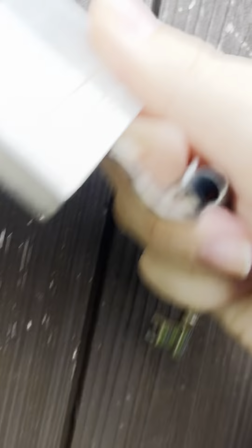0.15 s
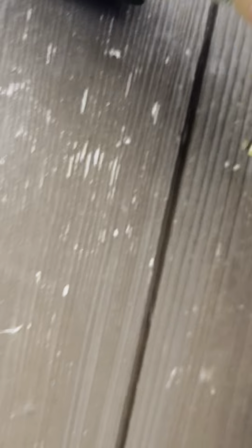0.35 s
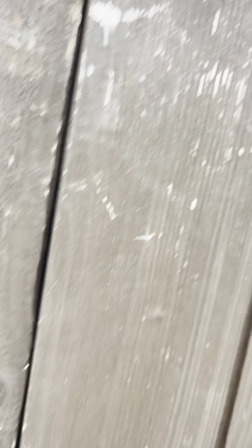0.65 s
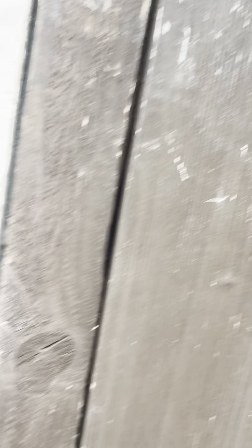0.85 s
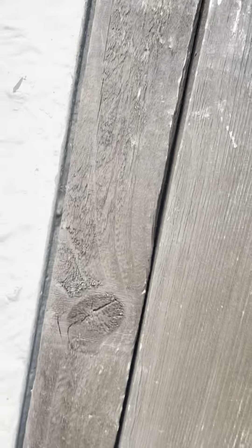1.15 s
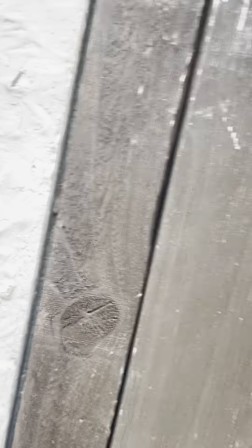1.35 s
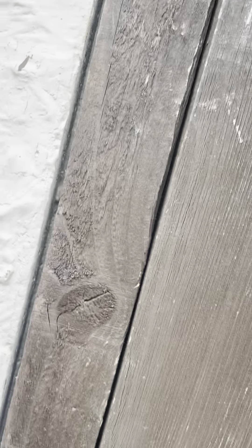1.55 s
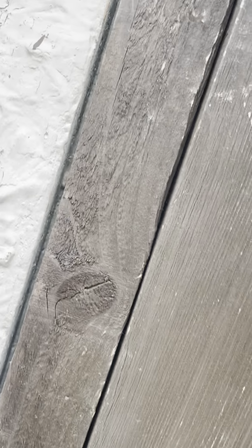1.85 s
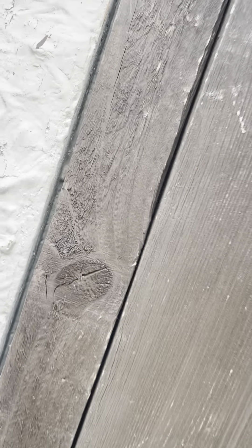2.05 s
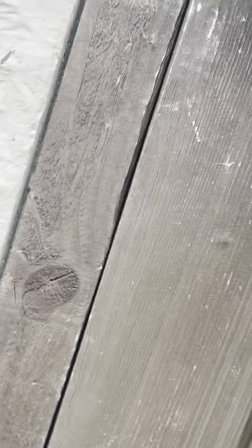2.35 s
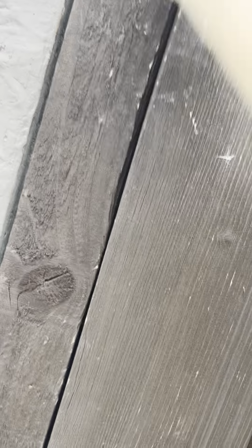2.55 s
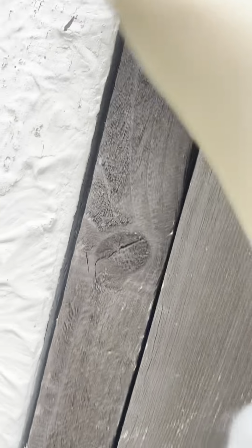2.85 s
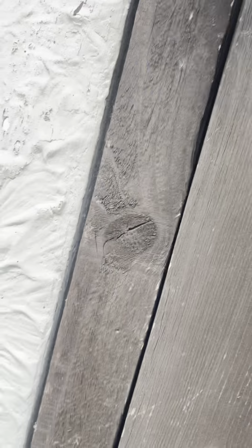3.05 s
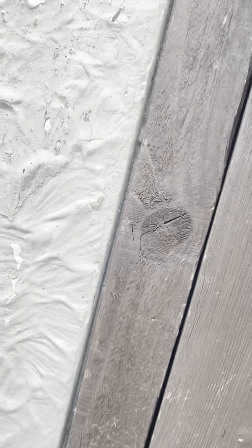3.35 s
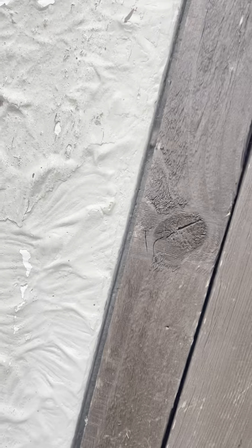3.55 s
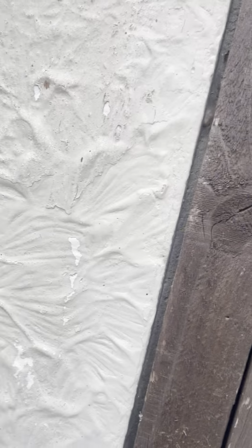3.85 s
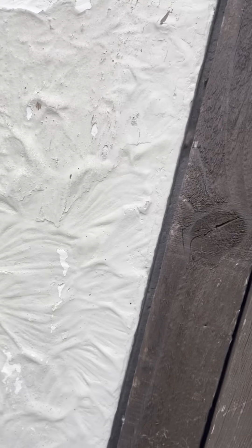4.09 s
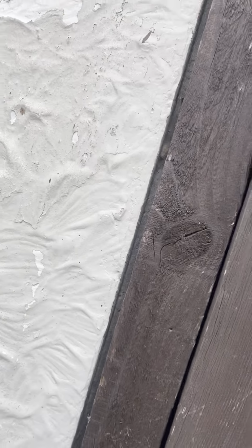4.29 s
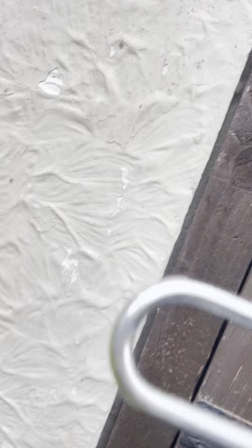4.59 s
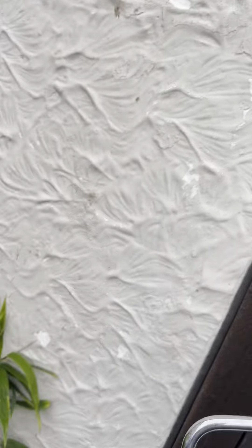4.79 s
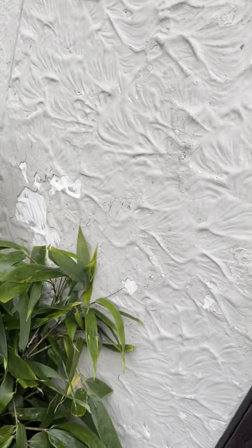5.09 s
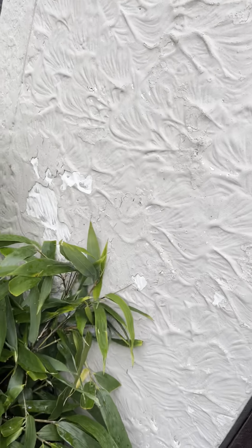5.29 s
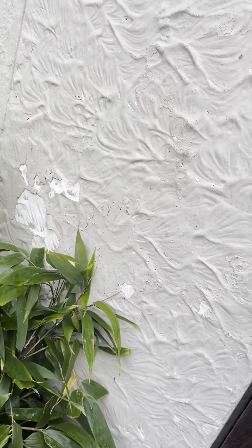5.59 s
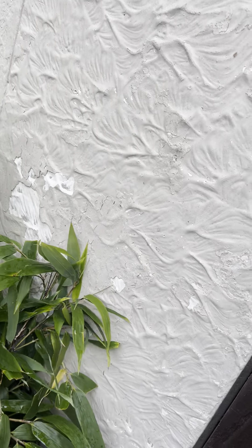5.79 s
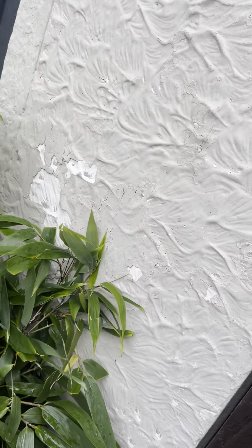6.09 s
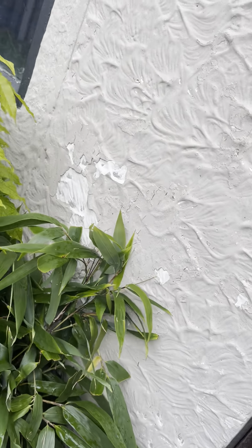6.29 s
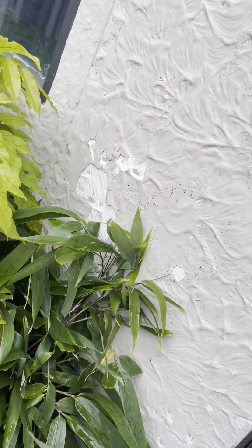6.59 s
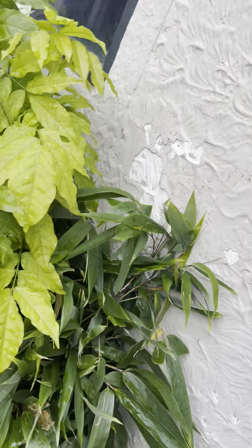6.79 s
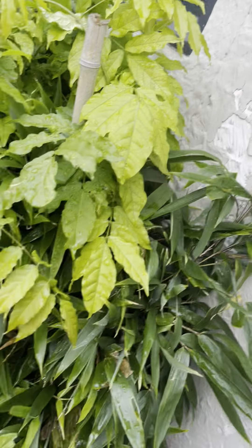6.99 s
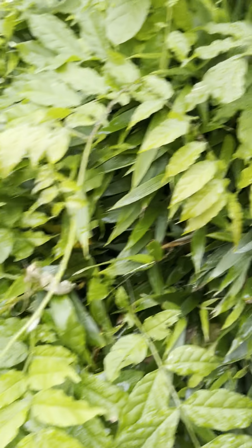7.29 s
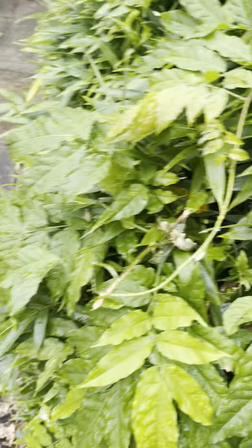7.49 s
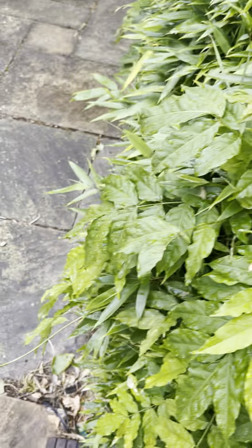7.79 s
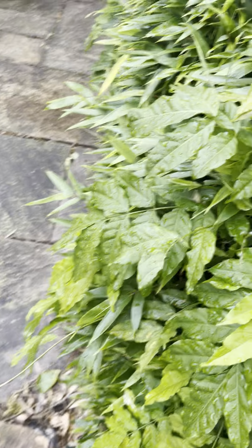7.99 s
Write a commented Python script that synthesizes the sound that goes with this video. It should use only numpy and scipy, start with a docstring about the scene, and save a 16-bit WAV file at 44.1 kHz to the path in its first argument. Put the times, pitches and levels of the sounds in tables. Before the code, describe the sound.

Keys jingle and clack in the lock of a wooden plank door, with sharp metallic knocks, small scrapes and one brief squeak.

```python
"""Keys click and scrape in the lock of a wooden plank door, bolts knock into the wood, and the cylinder squeaks.
Noise bursts ring modes of keys, lock case and planks; wavering sines squeak and single keys ring on.
Shaped noise makes friction, the rustle of cloth and leaves, far traffic, and a low handling rumble.
A hand-held phone hears it all through two microphone ports that differ in phase and bass."""
import sys
import numpy as np
from scipy import signal
from scipy.fft import rfft, irfft, next_fast_len
from scipy.io import wavfile
from scipy.ndimage import uniform_filter1d

SR = 44100
rng = np.random.default_rng(int(sys.argv[2]) if len(sys.argv) > 2 else 0)


def digitize_waveform(pressure):
    """Quantize a signal to 16-bit integers and store it at the path in sys.argv[1].

    Rows of a 2-D input are taken as channels; values are limited to [-1, 1].
    """
    field = np.atleast_2d(pressure).T
    bounded = np.clip(field, -1, 1)
    quanta = np.round(bounded * 32767).astype(np.int16)
    wavfile.write(sys.argv[1], SR, quanta)


N = 358974

# blows of metal on metal: t/s, drive of lock case/dB, of keys/dB, of door/dB,
# best excited region of the lock f/Hz, of the door f/Hz
BLOWS = [(0.016, -35, -34, -50, 744, 364), (0.078, -41, -46, -47, 735, 423),
         (0.188, -39, -38.5, -52.5, 2950, 158.6), (.203, -43, -41, -43, 826, 360),
         (.244, -32, -52, -75, 3880, 120), (.251, -18.5, -25, -30.5, 754, 238),
         (0.321, -37.5, -25.5, -42, 1270, 154), (0.435, -79, -32, -56.5, 1070, 300),
         (0.576, -35, -72, -36.5, 724, 383), (.743, -55, -42.5, -45.5, 945, 210),
         (0.843, -55, -69, -43, 810, 163), (0.924, -46.5, -67, -49.5, 750, 164),
         (1.333, -5, -10, -18, 2050, 220), (1.426, -31, -54, -39.5, 1380, 440),
         (1.505, -17, -45, -24, 1350, 314), (1.756, -30, -44, -34.5, 2640, 118),
         (1.929, -3, -13.5, -12.5, 750, 190), (1.985, -5.5, -12.5, -21, 1380, 175.1),
         (2.048, -35, -96, -31, 734, 128), (2.155, -37.5, -46, -36, 830, 144),
         (2.203, -34.5, -35, -41, 1160, 121), (2.315, -46.5, -73, -41, 980, 116),
         (2.367, -23.5, -60, -30, 1350, 229), (2.411, -38.5, -42.5, -39.5, 1230, 232),
         (2.52, -39.5, -47.5, -28.5, 790, 234), (2.567, -34, -50, -32.5, 880, 144),
         (2.595, -17.5, -27, -26, 845, 145), (2.923, -38, -35, -54, 3970, 122),
         (2.991, -37, -55, -44, 760, 288), (3.044, -40.5, -33.5, -44.5, 940, 126),
         (3.184, -18, -39.5, -26, 1620, 295), (3.265, -5, -3, -23.5, 1370, 209),
         (3.585, -29, -54, -25, 700, 220), (3.768, -58, -69, -43, 897, 237),
         (3.843, -44.5, -45.5, -52, 810, 132.4), (3.9, -27.5, -48.5, -32, 1190, 134),
         (3.938, -20.5, -50, -28, 1350, 296), (4.005, -31, -50, -44, 935, 161),
         (4.102, -13, -11.5, -30, 2380, 382), (4.144, -39, -44, -44.5, 775, 124),
         (4.192, -47, -49, -53, 930, 121), (4.352, -47, -62, -48.5, 716, 407),
         (4.406, -56, -49, -70, 890, 120), (4.432, -57, -42, -58, 750, 315),
         (4.462, -60, -42.5, -64, 714, 295), (4.863, -10.5, -7.5, -18, 2240, 450),
         (4.956, -22, -46, -27, 1280, 589), (4.965, -8.5, -6.5, -29, 1350, 440),
         (5.013, -20.5, -32.5, -30, 1220, 139), (5.071, -62, -56, -47.5, 1070, 214),
         (5.14, -39, -31.5, -48, 4220, 186), (5.166, -20.5, -23, -24.5, 4330, 392),
         (5.178, -23, -29.5, -31, 4300, 233), (5.22, -33.5, -47, -37.5, 785, 230),
         (5.257, -21.5, -34, -43, 2470, 153), (5.316, -36, -44, -49, 1080, 445),
         (5.361, -32.5, -30.5, -52, 1240, 157), (5.387, -31.5, -29, -42, 1620, 490),
         (5.405, -35.5, -41, -36, 1240, 328), (5.43, -35.5, -40, -35, 1480, 394),
         (5.499, -62.5, -49, -76, 814, 168.7), (5.632, -38.5, -68.5, -46.5, 1213, 338),
         (6.185, -13.5, -19.5, -26, 2390, 327), (6.27, -7.5, -32, -21.5, 910, 626),
         (6.289, -2.5, -8, -23.5, 1140, 162), (6.315, -18, -36, -32, 1340, 196),
         (6.348, -14.5, -52, -33, 1140, 237), (6.381, -20.5, -37.5, -43.5, 1410, 215),
         (6.474, -10.5, -30.5, -31, 2540, 444), (6.701, -43.5, -53, -59, 1350, 232),
         (6.893, -47.5, -52, -57, 1113, 174), (7.361, -40.5, -73, -43.5, 1660, 342),
         (7.389, -30, -58, -34, 1610, 606), (7.418, -32.5, -50.5, -36.5, 1220, 380),
         (7.462, -41, -85, -43, 1590, 168), (7.536, -27.5, -48, -36.5, 1390, 672),
         (7.553, -28.5, -41.5, -36.5, 1840, 281), (7.612, -37.5, -63, -46, 1950, 159),
         (7.689, -29, -73, -28, 1180, 350), (7.921, -42.5, -54, -65, 750, 118)]
# ringing modes of each body: f/Hz, relative level/dB, t60/s
DOOR_MODES = [(119, -5.5, 0.069), (161, -2, 0.099), (232.4, -1.5, 0.17), (292.4, -5, .07), (326, 1, 0.049),
              (395.8, 1.5, 0.041), (466.4, -3, 0.05), (492, -6, 0.12), (626.8, -2.5, 0.014)]
LOCK_MODES = [(755, -3, .03), (904, -3, .03), (1173, 0, .025), (1350, -1, .025), (1650, -1, .025),
              (1870, -3, .02), (2190, 0, .02), (2500, 0, .018), (2800, -3, .015), (3270, -6, .015),
              (3800, -8, .012), (4300, -3, .02)]
KEY_MODES = [(5080, -1, 0.024), (5710, 3.5, 0.0025), (6170, -2, 0.0027), (6730, -6.5, .01),
             (8400, 4, 0.0034), (8870, 0.5, .008), (10370, -1, 0.0034), (10460, -1.5, 0.03),
             (11460, -3, 0.01), (12940, 1, 0.02)]


def lock_and_door(friction_db, load_db):
    """Blows and scrapes add up in keys, lock case and planks, each heard in its own band."""
    keys, case, planks = np.add(struck(), rubbed(friction_db, load_db))
    return band(keys, 4000, 15000) + band(case, 450, 6000) + band(planks, 80, 1400)


def struck():
    """Metal parts bounce many times in one blow and drive the modes; the heavy planks answer last."""
    # the louder the keys ring against the lock, the higher their best region: keys over lock level/dB, f/Hz
    key_region = [(-6, 6300), (1, 11300)]
    start, lock_db, key_db, door_db, lock_hz, door_hz = np.transpose(BLOWS)
    key_over_lock_db = key_db - lock_db
    key_hz = np.interp(key_over_lock_db, *np.transpose(key_region))
    # time base of the rattle, shorter where the keys ring over the lock; each layer scales it
    ms = 4.96 - 0.0437 * np.maximum(key_over_lock_db, 0)
    # soft blows, where the keys hardly ring, crack less in the treble
    crack_db = lock_db + 0.57 * np.minimum(key_over_lock_db, 0) + 4.5
    key_grit, case_grit, wood_grit = [grit(14000, 0.7) for _ in range(3)]

    # a hard first contact, then the bounces
    key_push = push(start, key_db + 5.5, np.minimum(0.15 * ms, .8), rise_ms=0.18)
    key_push += push(start, key_db + 3.0, 0.61 * ms, rise_ms=0.99)
    keys = key_grit * key_push
    case_push = push(start, lock_db, 0.54 * ms, rise_ms=0.49)
    case_push += push(start, lock_db - 16, 2.22 * ms, rise_ms=0.99)
    case = case_grit * case_push
    crack = case_grit * push(start, crack_db, 0.51 * ms, rise_ms=0.63)
    # wood takes one soft push and a little of the chatter
    planks = push(start, door_db + 12.5, 0.048 * ms, rise_ms=0.27, late_ms=3.)
    planks += wood_grit * push(start, door_db + 5.5, 2.0 * ms, rise_ms=3.5, late_ms=3.9)

    # ringing bodies plus the direct clatter of the metal
    key_sound = undb(4) * body(keys, KEY_MODES, 3, start, key_hz, 10) + undb(1) * keys
    clatter = band(case, 600, 2200) + band(crack, 2200, 5500)
    case_sound = body(case, LOCK_MODES, 2.5, start, lock_hz, 9) + undb(4) * clatter
    return key_sound, case_sound, body(planks, DOOR_MODES, 5.2, start, door_hz, 11.0)


def rubbed(friction_db, load_db):
    """The key drags over the pins, and light friction and load keep the same bodies whispering."""
    # scrapes that swell and stop: start t/s, length/s, drive of lock case/dB, of keys/dB, of door/dB,
    # best excited region of the lock f/Hz
    scrapes = [(1.113, 0.02, -32, -41, -28.5, 1980), (1.306, 0.025, -24.5, -38, -58, 1910),
               (1.391, 0.039, -40.5, -46, -54, 2150), (1.627, .071, -28.5, -38.5, -29, 4340),
               (1.682, .036, -26, -33.5, -22.5, 4430), (1.814, 0.053, -55, -57, -56, 4300),
               (1.905, 0.022, -23, -36, -28.5, 1170), (1.971, 0.016, -23, -40, -31, 890),
               (2.073, 0.037, -51.5, -49, -41.5, 4300), (2.136, 0.015, -39, -39, -46.5, 2500),
               (3.143, 0.099, -39.5, -46, -35.5, 1660), (3.257, 0.006, -17, -27.5, -42, 1350),
               (3.575, .12, -70, -56.5, -40.5, 1310), (4.049, 0.031, -21.5, -36, -28.5, 2360),
               (4.084, 0.011, -26.5, -25.5, -33.5, 2440), (4.112, .03, -50.5, -61, -38, 2500),
               (4.33, 0.024, -49.5, -64, -39.5, 1610), (5.169, .034, -41, -42.5, -27, 4230),
               (5.402, 0.051, -60, -58, -40, 1600), (6.279, 0.025, -24, -25.5, -26, 1200)]
    start, length, lock_db, key_db, door_db, lock_hz = np.transpose(scrapes)
    keys = drag(start, length, key_db) + undb(friction_db - 12 + 2.2 * walk(40)) * grit(3000, 2.1)
    case = drag(start, length, lock_db) + undb(friction_db + 4 + 0.7 * walk(60)) * grit(4200, 0.87)
    planks = drag(start, length, door_db) + undb(load_db + 1.9 * walk(30)) * rng.standard_normal(N)
    # a dragging key always excites the same regions of keys and door best
    key_hz, door_hz = np.full(len(start), 6000), np.full(len(start), 230)
    key_sound = undb(5) * body(keys, KEY_MODES, 3, start, key_hz, 5) + undb(1.5) * keys
    case_sound = undb(-1) * body(case, LOCK_MODES, 2.5, start, lock_hz, 5) + undb(3) * band(case, 500, 2800)
    return key_sound, case_sound, body(planks, DOOR_MODES, 4.2, start, door_hz, 5.3)


def push(start, db, length_ms, rise_ms, late_ms=0.):
    """The push of each blow rises quickly and dies away exponentially."""
    shape, t_ms = np.zeros(N + 8192), 1000 * np.arange(8192) / SR
    for s, gain, ms in zip(start, undb(db), np.clip(length_ms, .1, 30)):
        i = int((s + late_ms / 1000) * SR)
        shape[i:i + 8192] += gain * (1 - np.exp(-t_ms / rise_ms)) * np.exp(-t_ms / ms)
    return shape[:N]


def drag(start, length, db, stop_ms=5.0):
    """The force of each scrape: grit that swells under growing pressure and stops short."""
    shape, t = np.zeros(N + 8192), np.arange(8192) / SR
    for s, span, gain in zip(start, length, undb(db)):
        swell = np.minimum(t / span, 1) ** 0.86
        stop = np.exp(-np.maximum(t - span, 0) * 1000 / stop_ms)
        i = int(s * SR)
        shape[i:i + 8192] += gain * swell * stop
    return shape[:N] * undb(3.1 * walk(250)) * grit(9000, 2)


def grit(rate, spread_db):
    """Dense irregular micro-impacts, about rate per second, rms 1."""
    hits = rng.random(N) < rate / SR
    return level(hits * rng.standard_normal(N) * undb(spread_db * rng.exponential(size=N)), 0)


def body(force, modes, scatter_db, start, best_hz, focus_db):
    """Every contact lands elsewhere: from its start on, modes near best_hz take more force, the rest vary."""
    hz, db, t60 = np.transpose(modes)
    contact_now = np.clip(np.searchsorted(start, np.arange(N) / SR, "right") - 1, 0, None)
    near = np.exp(-(np.log(hz / best_hz[:, None]) / .2) ** 2)
    scatter = scatter_db * rng.standard_normal((len(start), len(modes)))
    share = undb(db + focus_db * near + scatter)
    share /= np.sqrt(np.sum(share ** 2, axis=1, keepdims=True))  # same total power for each contact
    out = np.zeros(N)
    for k in range(len(modes)):
        out += (-1) ** k * mode(force * share[contact_now, k], hz[k], t60[k])  # neighbours alternate in sign
    return out


def mode(x, hz, t60):
    """One ringing mode, a complex one-pole resonator that passes noise at unit power."""
    r = np.exp(-np.log(1000) / (t60 * SR))
    pole = r * np.exp(2j * np.pi * hz / SR)
    return signal.lfilter([np.sqrt(2 * (1 - r * r))], [1, -pole], x).imag


def squeak():
    """Stick-slip of the turning cylinder locks to one mode: a near sine that wavers, with a weak octave."""
    # glide of the squeak: t/s, f/Hz, rms level before flutter/dB
    glide = [(3.127, 1536, -60), (3.144, 1600, -49.5), (3.176, 1630, -38.5), (3.187, 1627, -24.5),
             (3.209, 1647, -21.5), (3.225, 1660, -34), (3.255, 1624, -38), (3.267, 1640, -51)]
    s, hz, db = np.transpose(glide)
    t = np.arange(N) / SR
    pitch_hz = np.interp(t, s, hz) * (1 + 0.0084 * walk(150))
    phase = 2 * np.pi * np.cumsum(pitch_hz) / SR
    gain = undb(np.interp(t, s, db, -120, -120) + 1.5 * walk(240))
    return np.sqrt(2) * gain * (np.sin(phase) + undb(-28) * np.sin(2 * phase))


def rings():
    """Decaying sines ring on and outlast the blow: mostly single modes of a free key, and at 4.75 s a faint
    squeak of the cylinder near 1.7 kHz."""
    # ringing tones, mostly free keys, the one at 4.75 s a faint squeak: t/s, f/Hz, level/dB, t60/s
    ringing_tones = [(.021, 9000, -49, .06), (2.986, 3050, -52, .6), (3.269, 11400, -25, .12),
                     (4.441, 8100, -52, .13), (4.75, 1680, -56, .6), (4.886, 5830, -45, .4),
                     (5.179, 4350, -21, .03), (5.258, 2400, -37, .03), (5.433, 1500, -37, .08),
                     (5.433, 3900, -42, .05), (5.436, 5850, -62, .25), (6.289, 7200, -24, .06),
                     (6.291, 10100, -35, .05), (6.476, 2500, -32, .06), (7.611, 2050, -45, .05),
                     (7.632, 2700, -47, .03)]
    out, t = np.zeros(N + SR), np.arange(SR) / SR
    for s, hz, db, t60 in ringing_tones:
        i = int(s * SR)
        envelope = undb(db - 60 * t / t60) * np.minimum(t / 0.0031, 1)
        out[i:i + SR] += envelope * np.sin(2 * np.pi * hz * t)
    return out[:N]


def porch(x, t60=0.14, wet_db=-16):
    """Short reflections from door, wall and paving: a decaying noise tail."""
    t = np.arange(SR // 4) / SR
    tail = rng.standard_normal(len(t)) * undb(-60 * t / t60) * np.minimum(t / 0.0025, 1)
    return x + undb(wet_db) * signal.fftconvolve(x, tail / np.sqrt(np.sum(tail ** 2)))[:N]


def contact():
    """Levels (dB) of friction, rustle, load and rumble: powers of rest, movements and settling add up."""
    # movements of hand and sleeve: middle t/s, length/s, friction in the lock/dB, rustle/dB,
    # load on the door/dB, rumble/dB
    moves = [(.01, 0.032, -58.5, -70, -52, -66), (0.615, 0.37, -63.5, -71.5, -51.5, -56.5),
             (0.898, 0.11, -79, -84, -70, -45.5), (1.08, 0.24, -62.5, -88, -49.5, -51.5),
             (1.506, 0.33, -55, -69, -44.5, -46), (1.885, 0.21, -58, -69.5, -44, -49),
             (2.115, 0.22, -65, -76.5, -48, -39.5), (2.442, 0.19, -58.5, -71.5, -40, -44),
             (2.629, 0.15, -61.5, -74, -44, -40.5), (3.031, .2, -62, -83, -50.5, -45),
             (3.302, 0.33, -61, -76.5, -51.5, -52.5), (3.643, .2, -56.5, -70.5, -49.5, -46),
             (3.946, 0.13, -63, -73.5, -41, -45), (4.095, 0.26, -62.5, -81.5, -49.5, -38.5),
             (4.486, 0.28, -68.5, -73.5, -62, -71), (4.78, 0.11, -69, -85.5, -57.5, -64),
             (4.972, .2, -54, -66, -40, -45.5), (5.252, 0.31, -66, -74, -46, -42.5),
             (5.784, 0.36, -81, -84.5, -62, -63), (6.34, .2, -50, -68.5, -38.5, -54.5),
             (6.68, 0.082, -64, -74.5, -55.5, -55.5), (7.047, 0.29, -77, -75, -71, -59.5),
             (7.691, 0.12, -70, -67.5, -53, -59.5), (8.04, 0.49, -64, -67, -65, -61.5),
             (8.13, 0.088, -59.5, -61.5, -47, -43)]
    middle, length, friction_db, rustle_db, load_db, rumble_db = np.transpose(moves)
    lock_db, door_db = np.transpose(BLOWS)[[1, 3]]
    friction = undb(2 * -86.5) + swells(middle, length, friction_db)
    cloth = undb(2 * -91.5) + swells(middle, length, rustle_db)
    load = undb(2 * -70) + swells(middle, length, load_db)
    low = undb(2 * -55) + swells(middle, length, rumble_db)
    # after a blow loose parts settle and the planks shake
    friction += settle(lock_db, slope=0.66, top_db=-43, t60=0.51)
    load += settle(door_db, slope=0.79, top_db=-23, t60=0.55)
    low += settle(door_db, slope=0.83, top_db=-30, t60=1.7)
    return 10 * np.log10((friction, cloth, load, low))


def swells(middle, length, db):
    """Power of movements that swell, hold and fade, about 4 dB down at both ends."""
    t = np.arange(0, N, 64) / SR
    power = undb(2 * db) @ np.exp(-(2 * (t - middle[:, None]) / length[:, None]) ** 4)
    return np.interp(np.arange(N) / SR, t, power)


def settle(blow_db, slope, top_db, t60):
    """Power that jumps at each blow, by slope dB per dB of it and top_db for a 0 dB blow, and dies away."""
    kicks = np.zeros(N)
    kicks[(np.transpose(BLOWS)[0] * SR).astype(int)] = undb(2 * (top_db + slope * blow_db))
    power = signal.lfilter([1], [1, -undb(-2 * 60 / t60 / SR)], kicks)
    return uniform_filter1d(power, size=301, origin=150)  # a 7 ms onset


def rustle(db):
    """Cloth and leaves: fine noise with a light grain that flickers."""
    # spectrum of the rustle: f/Hz, relative level per Hz/dB
    spectrum = [(500, -30.5), (1500, -13.5), (3000, -14.5), (5000, -5.5), (8000, -0.5), (10700, 1),
                (16000, -13)]
    fine = level(colour(rng.standard_normal(N) + 0.55 * grit(2100, 2.5), spectrum), 0)
    return undb(db + 15.0 + 0.82 * walk(13)) * fine


def far_sounds_and_rumble(rumble_db):
    """Wavering noise of far traffic and air, and a low handling rumble that follows the moving hand and the blows."""
    # spectra of far sounds and of the rumble: f/Hz, relative level per Hz/dB
    far_spectrum, low_spectrum = [(60, -32.5), (130, -5), (300, -4), (530, -10.5), (930, -9.5),
                                  (2000, -20.5), (4000, -36.5), (9000, -70.5)], [(15, -39), (30, -10), (50, 6.5), (75, 0), (130, -7),
                                                    (260, -13.5), (600, -46.5)]
    far = undb(0.38 * walk(2.4)) * level(colour(rng.standard_normal(N), far_spectrum), -60)
    return far + undb(rumble_db + 1.5) * level(colour(rng.standard_normal(N), low_spectrum), 0)


def undb(db):
    """Decibels to an amplitude factor (twice the decibels give a power factor)."""
    return 10 ** (np.asarray(db) / 20)


def level(x, db):
    """Scale to an rms level."""
    return x * undb(db) / np.sqrt(np.mean(x ** 2))


def over_hz(table, size):
    """A (Hz, value) table on the bins of a transform, straight on a log axis."""
    hz, value = np.transpose(table)
    return np.interp(np.log(np.arange(size // 2 + 1) * SR / size + 1), np.log(hz + 1), value)


def colour(x, table):
    """Filter by a (Hz, dB) curve."""
    return irfft(rfft(x) * undb(over_hz(table, len(x))), len(x))


def band(x, lo_hz, hi_hz):
    """Gentle band-pass."""
    return signal.sosfilt(signal.butter(2, [lo_hz, hi_hz], "band", fs=SR, output="sos"), x)


def walk(rate):
    """A random wander through a new level every 1 / rate s, rms near 1.5."""
    k = int(SR / rate)
    return 1.8 * uniform_filter1d(np.repeat(rng.standard_normal(N // k + 1), k), k)[:N]


def scene():
    """All sources reach both ports alike, but for bands that arrive by short paths that shift at random."""
    # where the two ports pick up different paths: f/Hz, level of unrelated sound/dB before it is shared out
    apart = [(100, -22), (300, -8), (700, 2), (1500, -6), (2400, -4), (3400, 4), (4500, 0), (5000, 3),
             (6000, -14), (11500, -16), (13500, -12)]
    friction_db, rustle_db, load_db, rumble_db = contact()
    metal_and_wood = lock_and_door(friction_db, load_db) + squeak() + rings()
    air = porch(metal_and_wood) + rustle(rustle_db) + far_sounds_and_rumble(rumble_db)
    path = rng.standard_normal(256) * np.exp(-np.arange(256) / 60)
    path /= np.sqrt(np.sum(path ** 2))
    other = np.tanh(2 * walk(30)) * colour(signal.fftconvolve(air, path)[:N], apart)
    return air + other * np.array([[.5], [-.5]])  # opposite sign in the two ports


def record(dry):
    """The ports differ in phase and bass and share one response; loud peaks are rounded and the top is cut."""
    # shared response of the ports: f/Hz, level/dB
    response = [(20, -14), (100, 2.5), (9500, -7.5), (11400, -7.5), (12000, -18.5), (12500, -14),
                (13200, -27), (15500, -30.5), (22000, -31)]
    # phase by which the left port leads: f/Hz, phase/rad
    lead = [(0, 0), (860, .4), (1550, 0), (2200, .4), (2900, 1.1), (3900, .7), (4700, 1.8), (4950, 3.2),
            (5200, 4.7), (5800, 6.2), (7200, 7.7), (8440, 9), (9200, 9.4), (10500, 11), (11900, 12.4),
            (13400, 12.7), (15800, 15.8)]
    # balance of the ports: f/Hz, left minus right level/dB
    lean = [(60, -1), (110, -1.5), (200, -3), (380, -5.5), (700, -4), (1290, -.5), (4400, -.5), (15000, 0)]
    size = next_fast_len(N + 4096)
    half = undb(over_hz(lean, size) / 2) * np.exp(.5j * over_hz(lead, size))
    spectrum = rfft(dry, size) * undb(over_hz(response, size))
    ports = irfft(spectrum * np.array([half, 1 / half]), size)[:, :N]
    ports = np.tanh(ports)
    return signal.sosfilt(signal.ellip(8, .2, 70, 16000, fs=SR, output="sos"), ports)  # cut above 16 kHz


dry = scene()
out = record(dry)
digitize_waveform(out)
```